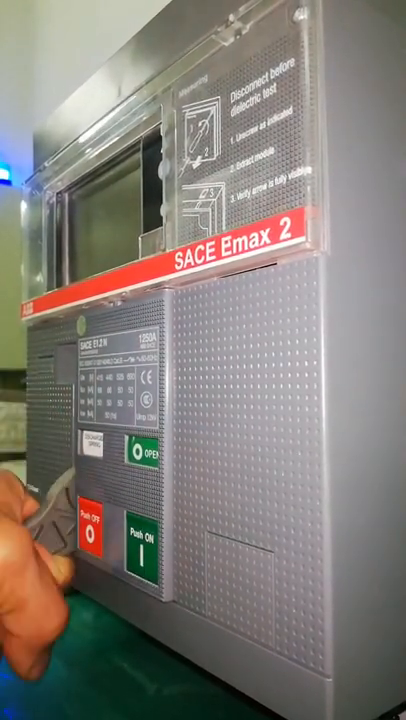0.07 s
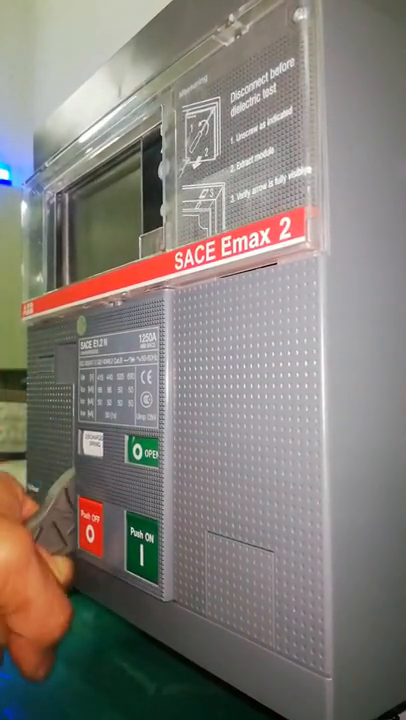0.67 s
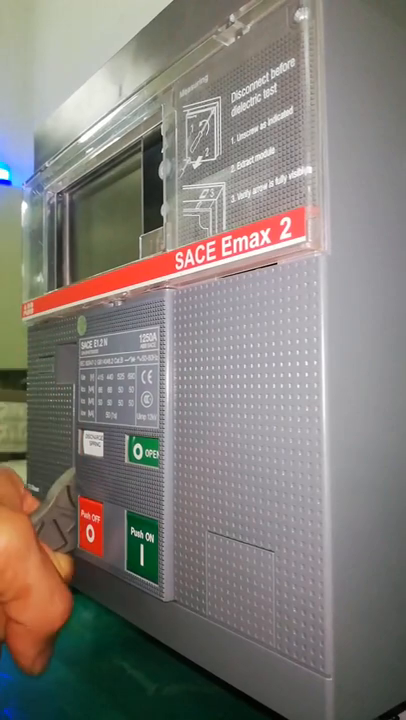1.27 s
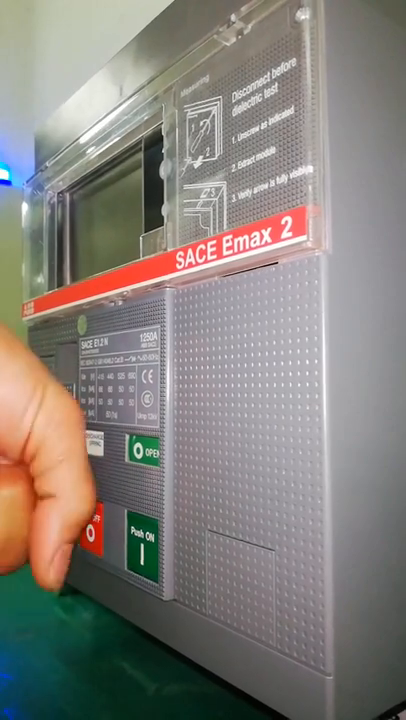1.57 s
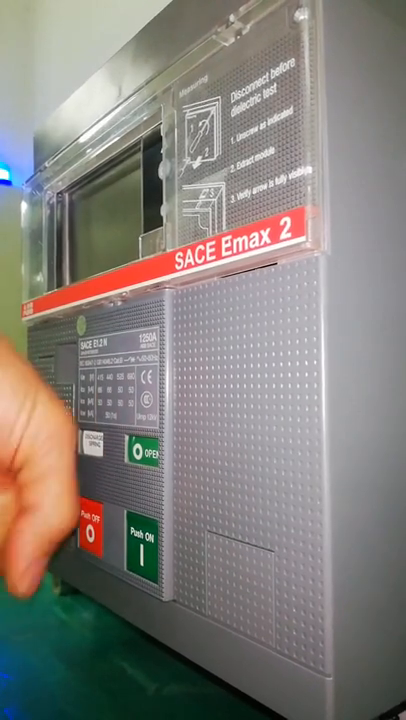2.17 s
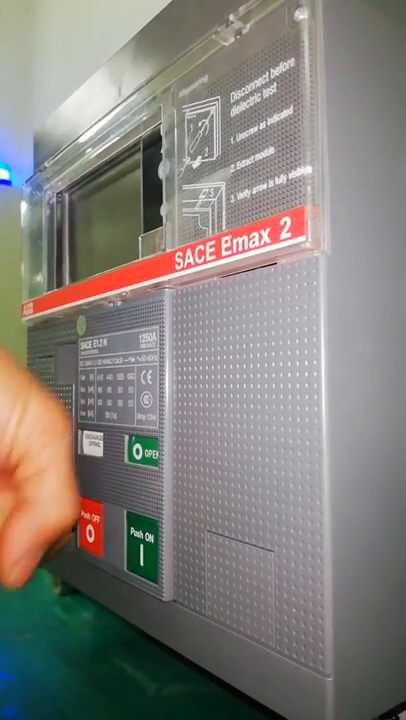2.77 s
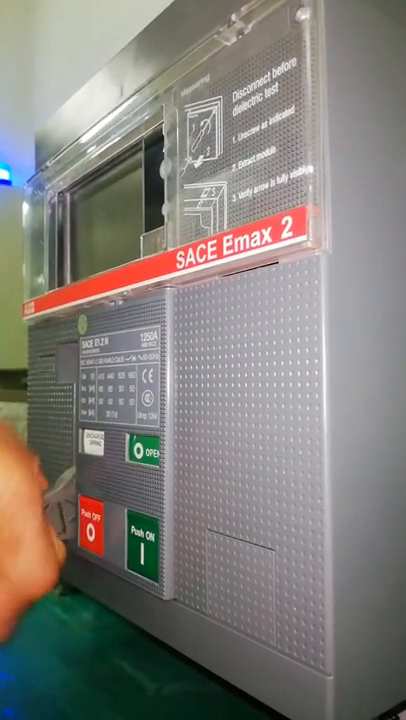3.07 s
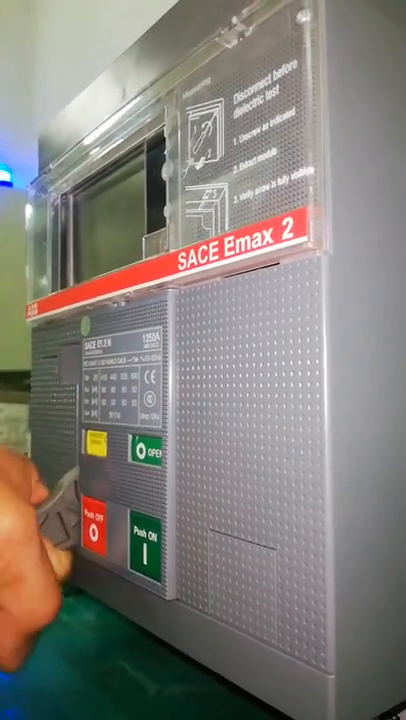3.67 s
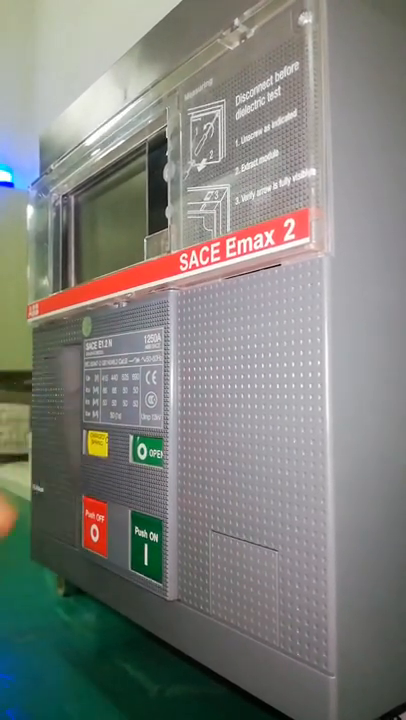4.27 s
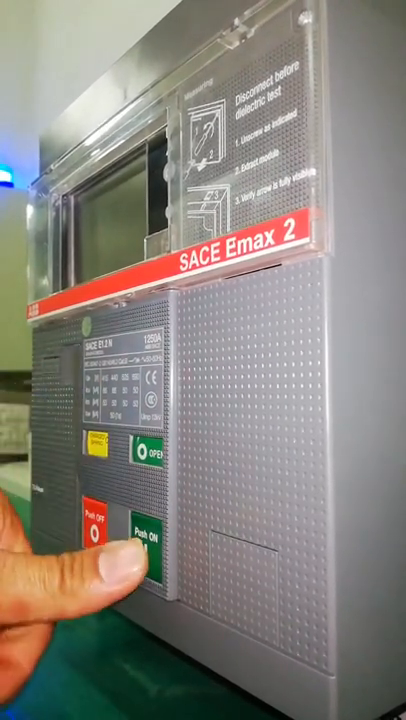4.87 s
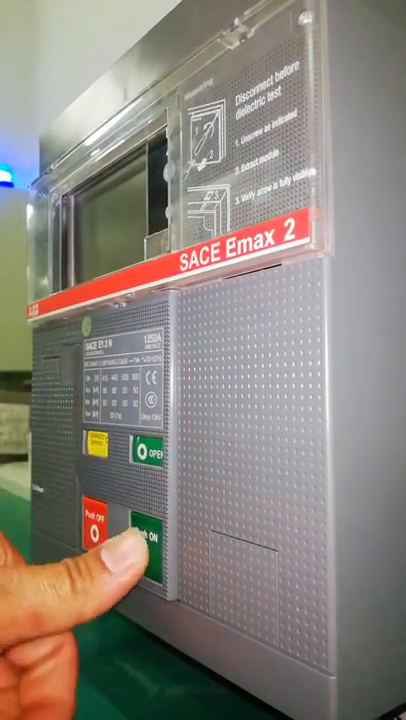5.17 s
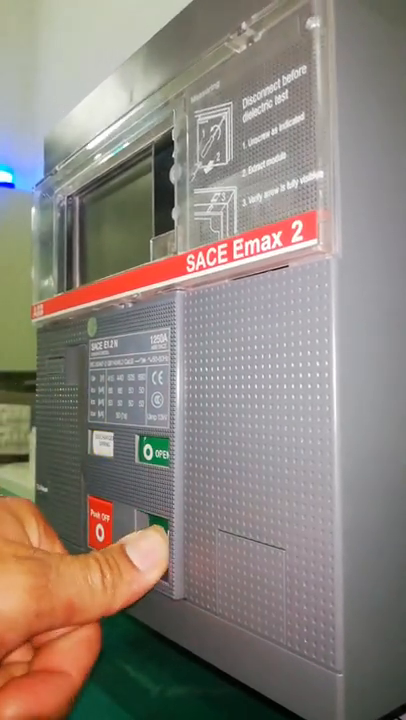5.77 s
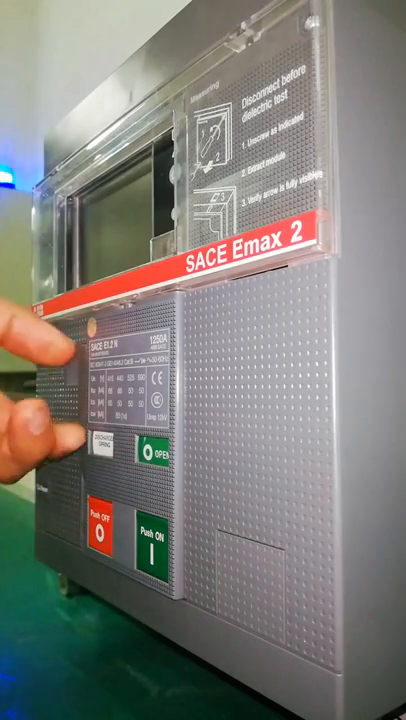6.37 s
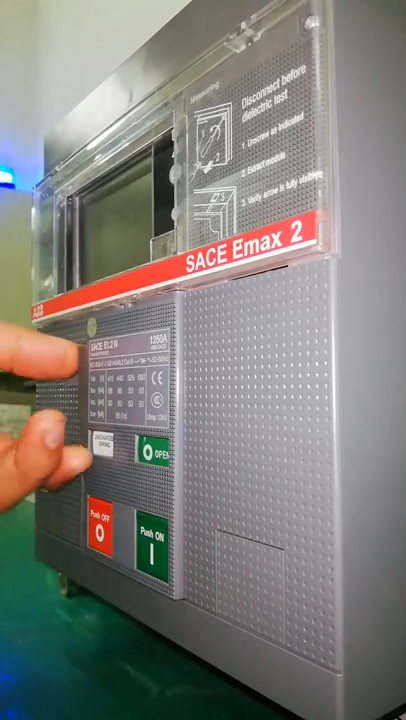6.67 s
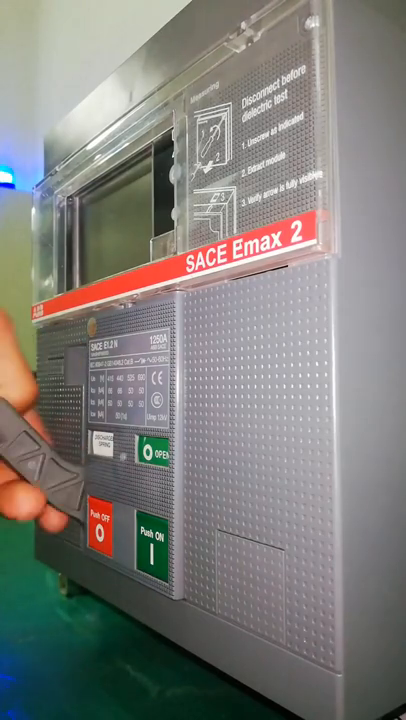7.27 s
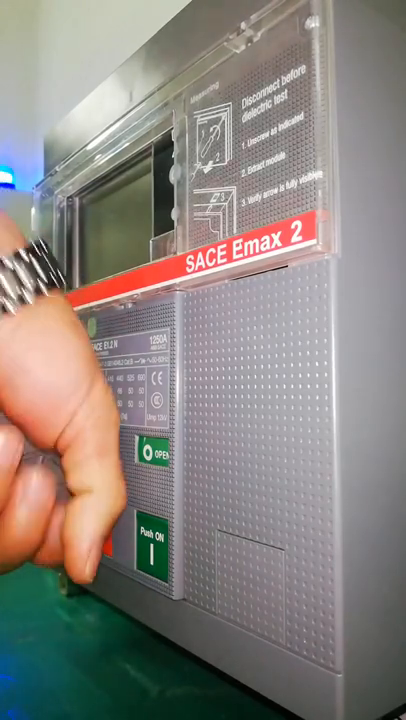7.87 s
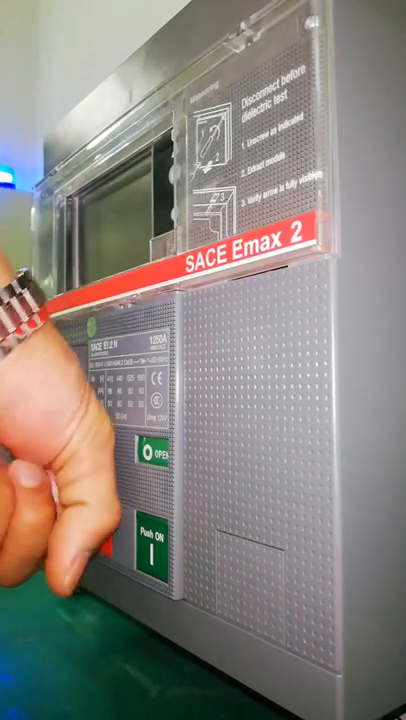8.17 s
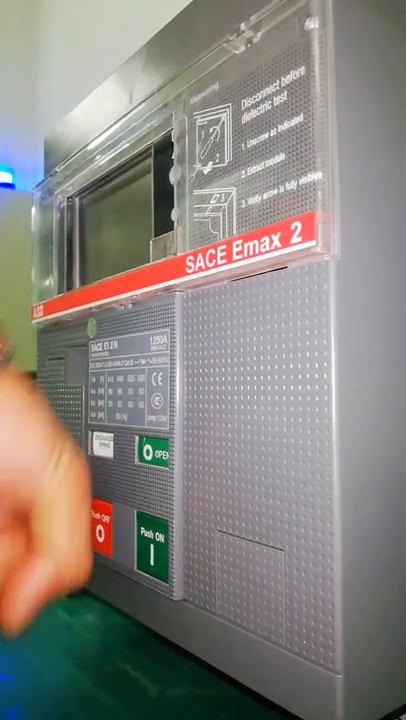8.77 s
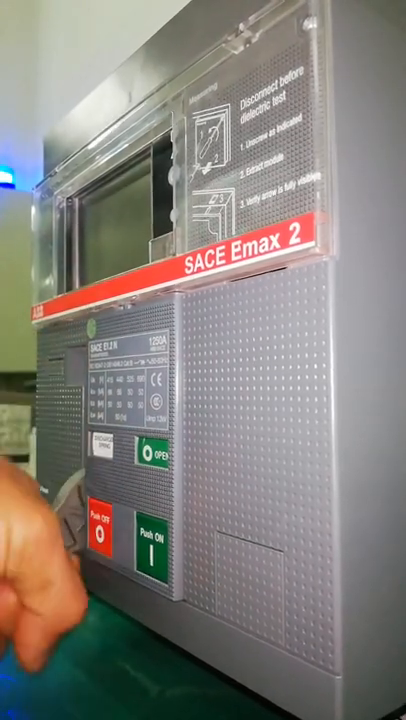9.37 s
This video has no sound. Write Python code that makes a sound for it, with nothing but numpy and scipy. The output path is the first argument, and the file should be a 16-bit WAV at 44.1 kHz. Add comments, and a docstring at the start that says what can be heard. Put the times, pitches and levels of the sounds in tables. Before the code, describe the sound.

Bursts of sharp ratchet clicks, a snap and plastic clatter lead to a circuit breaker slamming shut with a metallic ring, then more ratcheting.

```python
"""In a hard, humming hall a large circuit breaker is charged by hand: as the lever is pumped, a pawl
clicks over its ratchet, each impact exciting the resonances of the cover. The spring latches with a
snap, the lever folds away, the contacts slam shut and leave the steel ringing, and pumping resumes.
A close phone, its left port shaded, ducks each loud blow and lets the reverberation swell back."""
import sys
import numpy as np
from scipy import signal
from scipy.fft import rfft, irfft, next_fast_len
from scipy.io import wavfile
from scipy.ndimage import uniform_filter1d, map_coordinates

SR = 44100
rng = np.random.default_rng(int(sys.argv[2]) if len(sys.argv) > 2 else 0)


def transcribe(u):
    """Save the signal u as a 16-bit wav file named by the first command-line argument.

    u: samples, shape (n,) or (channels, n), limited to [-1, 1]; the rate is SR.
    q: integer samples, one column per channel.
    """
    v = np.clip(np.atleast_2d(u).T, -1, 1)
    q = np.round(v * 32767).astype(np.int16)
    wavfile.write(sys.argv[1], SR, q)


N = 424241

# down strokes: (time [s], teeth [count], gap [s], last gap [s], click level [dB], rubbing level [dB])
PULL_STROKES = [(0.0458, 3, .0373, .0375, -6.5, -55), (0.6194, 4, .031, .0518, -7, -45.5),
                (1.2106, 3, .031, .0304, -6, -58), (1.7872, 3, .0378, .0421, -6.5, -54),
                (2.372, 3, .0338, .0321, -5.5, -55), (2.9502, 3, .0391, .0305, -6.5, -45.5),
                (8.291, 1, 0, 0, -9, -66), (8.4704, 1, 0, 0, -6.5, -52),
                (8.542, 3, .0618, .0625, -8.5, -54), (9.2596, 4, .0348, .047, -9.5, -47)]
# up strokes: (time [s], teeth [count], gap [s], last gap [s], click level [dB], time to the top [s])
RETURN_STROKES = [(0.3244, 3, .0205, 0.023, -9.5, 0.16), (0.9046, 4, .022, .027, -9.5, 0.17),
                  (1.4742, 3, 0.021, 0.023, -9.5, 0.17), (2.0588, 3, .023, .028, -9.5, 0.16),
                  (2.631, 3, .022, 0.023, -9, 0.16), (3.231, 3, .028, .031, -9, .186),
                  (8.8781, 4, 0.029, 0.035, -11, 0.2), (9.5522, 3, 0.027, .0234, -10, .17)]
# the lever meeting its end stop: (time [s], level [dB])
STOP_IMPACTS = [(0.278, -24), (0.818, -36), (1.424, -24.5), (1.994, -29), (2.581, -25.5), (3.149, -28.5),
                (8.777, -35.5), (9.466, -31.5)]
# spectra of a click, its sharp edge, a cover knock and a case thump: (frequency [Hz], level [dB])
CLICK_SPECTRUM = [(500, -38), (900, -35), (1100, -9), (2000, -7), (3000, -4), (5000, 1), (7500, 1),
                  (9700, 1.5), (10800, -14.5), (15000, -35), (17000, -33)]
EDGE_SPECTRUM = [(4500, -39), (6500, -8), (7700, 4.5), (9500, -0.5), (11000, -6.5), (14800, -3.5),
                 (16000, -22)]
KNOCK_SPECTRUM = [(200, -37), (450, -14.5), (650, -1.5), (900, -3.5), (1100, 3.5), (1600, -3), (2500, -5.5),
                  (5000, -29.5)]
THUMP_SPECTRUM = [(10, -8), (30, -1), (60, 0), (130, -6), (200, -13), (500, -28), (1500, -55)]
# resonances of the ratchet and its cover: (frequency [Hz], bandwidth [Hz], gain [dB])
COVER_RESONANCES = [(1040, 54, 3.5), (1468, 30, 8), (2307, 135, 7), (2826, 69, 6.5), (3115, 180, 7),
                    (3330, 69, 8.5), (4080, 200, 9.5), (4996, 126, 5), (5970, 120, -0.5), (5880, 270, 4.5),
                    (6630, 320, 3), (7120, 89, -0.5), (7880, 320, 4), (9060, 630, 5.5), (9000, 150, 0)]


def amp(db):
    """Amplitude ratio of a level in decibels."""
    return 10 ** (np.asarray(db) / 20)


def unit(x):
    """Normalisation to rms 1."""
    return x / np.sqrt(np.mean(x ** 2) + 1e-20)


def along(points, hz):
    """Interpolation of (frequency [Hz], value) points on a logarithmic axis."""
    f, v = np.transpose(points)
    return np.interp(np.log(hz + 1), np.log(f + 1), v)


def seconds():
    """The time of each sample."""
    return np.arange(N) / SR


def wobble(rate):
    """Random modulation: a spline through `rate` Gaussian knots a second."""
    knots = rng.standard_normal(int(N * rate / SR) + 4)
    fine = np.linspace(0, len(knots) - 1, num=6 * len(knots))
    return np.interp(seconds() * rate, fine, map_coordinates(knots, [fine]))


def filtered(x, response):
    """Linear filtering: the spectrum is multiplied by a frequency response."""
    size = next_fast_len(N + SR // 4)
    hz = np.fft.rfftfreq(size, 1 / SR)
    return irfft(rfft(x, size) * response(hz), size)[..., :N]


def coloured_noise(spectrum):
    """Spectral shaping of two uncorrelated white noises, to rms 1."""
    return unit(filtered(rng.standard_normal((2, N)), lambda hz: amp(along(spectrum, hz))))


def body(spectrum, resonances=(), size=2048):
    """Minimum-phase impulse response of energy 1: Lorentzian resonances on a broad spectrum."""
    hz = np.fft.rfftfreq(size, 1 / SR)
    peaks_db = sum(gain / (1 + (2 * (hz - f) / width) ** 2) for f, width, gain in resonances)
    cepstrum = irfft(np.log(amp(along(spectrum, hz) + peaks_db)))
    cepstrum[1:size // 2] *= 2  # folding the cepstrum makes the response causal
    cepstrum[size // 2 + 1:] = 0
    response = irfft(np.exp(rfft(cepstrum)))
    return response / np.linalg.norm(response)


def strikes(times, levels, response, contact, t60, rattle_db, rattle_t60, lead=256):
    """Impact excitation of a body: chatter for `contact` seconds, a fast decay, then a weaker rattle."""
    t = np.maximum(np.arange(-lead, 2 ** 13 - lead), 0) / SR
    after = np.maximum(t - contact, 0)
    envelope = np.hypot(amp(-60 * after / t60), amp(rattle_db - 60 * after / rattle_t60))
    envelope *= 1 - np.exp(-t / 0.0004)
    sound = np.zeros((2, N + SR))
    for s, db in zip(times, levels):
        chatter = rfft(envelope * rng.standard_normal((2, len(t))))
        # a hard contact excites all frequencies alike, so the body alone sets the timbre
        chatter /= np.sqrt(np.abs(uniform_filter1d(np.abs(chatter) ** 2, size=170)) + 1e-12)
        blow = signal.fftconvolve(irfft(chatter), response[None], axes=1)
        blow *= np.linalg.norm(envelope) / np.linalg.norm(blow, axis=1, keepdims=True)
        sound[:, round(s * SR) - lead:][:, :blow.shape[1]] += amp(db) * blow
    return sound[:, :N]


def ring(start, modes, width_hz):
    """Beating: each mode is a cluster of close frequencies that interfere as they decay."""
    t = np.arange(2 * SR) / SR
    hz = np.fft.rfftfreq(len(t), 1 / SR)
    sound = np.zeros(N)
    for f, db, t60 in modes:
        band = 1 / (1 + (2 * (hz - f) / width_hz) ** 4)
        cluster = unit(irfft(band * rfft(rng.standard_normal(len(t)))))
        sound[round(start * SR):][:len(t)] += amp(db - 60 * t / t60) * cluster
    return sound


def background():
    """Superposition of wavering hum tones, a narrow-band drone and broadband ventilation noise."""
    # mains and fan tones: (frequency [Hz], level [dB])
    hum_tones = [(100, -52.5), (144, -54), (200, -56), (270, -60), (300, -63)]
    # envelope of the low drone: (time [s], level [dB])
    drone_levels = [(0, -56), (4.3, -79), (5, -51), (6.4, -60), (7.3, -58), (8.0, -47), (8.4, -52.5),
                    (8.7, -66), (9.62, -68)]
    # ventilation: (frequency [Hz], level [dB])
    air_spectrum = [(15, -60.5), (25, -18), (92, -12), (123, -7), (242, -6.5), (591, -18), (775, -16.5),
                    (1560, -22), (2110, -27), (2350, -25), (3520, -27), (4140, -34.5), (8140, -34),
                    (14400, -57.5), (16000, -74)]
    drone_spectrum = [(35, -18), (65, -5), (85, 18), (105, -16), (130, -20), (400, -60)]
    t, hum = seconds(), 0
    for f, db in hum_tones:
        peak = np.sqrt(2) * amp(db + 1.8 * wobble(4))
        hum += peak * np.sin(2 * np.pi * f * t + .45 * wobble(4))
    drone_db = np.interp(t, *np.transpose(drone_levels), right=-120)
    drone = amp(drone_db) * coloured_noise(drone_spectrum)
    return hum + drone + amp(-44.5) * coloured_noise(air_spectrum)


def teeth(strokes, fade_db=0.47):
    """Impulse trains, even but for the last gap: arrays of time [s], level [dB] and last-tooth flag."""
    clicks = []
    for start, count, gap, last_gap, db, _ in strokes:
        for k in range(count):
            last = k > 0 and k == count - 1
            clicks.append((start + k * gap + last * (last_gap - gap), db - fade_db * k, last))
    return np.transpose(clicks)


def hard_clicks(times, click_db, knock_db, edge_db, resonances):
    """Hard impact: brief contact gives a bright click and edge, longer contact a knock in the cover."""
    click = strikes(times, click_db, body(CLICK_SPECTRUM, COVER_RESONANCES + resonances),
                    contact=0.0011, t60=0.012, rattle_db=-20.5, rattle_t60=0.062)
    knock = strikes(times, knock_db, body(KNOCK_SPECTRUM, COVER_RESONANCES),
                    contact=0.0065, t60=0.06, rattle_db=-11, rattle_t60=0.19)
    edge = strikes(times, edge_db, body(EDGE_SPECTRUM),
                   contact=0.0015, t60=0.012, rattle_db=-33, rattle_t60=.03)
    return click + knock + edge


def ratchet():
    """Repeated impact: the pawl drops off each tooth, ringing higher under load than when it trails."""
    # resonances of the pawl: (frequency [Hz], bandwidth [Hz], gain [dB])
    loaded_pawl = [(3100, 240, 1.5), (4440, 530, -3), (5400, 330, 5), (5700, 200, 1), (6130, 180, 2.5),
                   (7200, 280, 5)]
    trailing_pawl = [(1500, 990, 0), (3150, 250, 2), (4520, 490, 4.5), (6540, 2400, -3.5)]
    times, db, _ = teeth(PULL_STROKES)
    down = hard_clicks(times, db, knock_db=db - 27.5, edge_db=db - 4.5, resonances=loaded_pawl)
    times, db, last = teeth(RETURN_STROKES)
    knock_db = db - 23.5 + 4.5 * last  # going up, the last tooth knocks harder
    up = hard_clicks(times, db, knock_db, edge_db=db - 19.5, resonances=trailing_pawl)
    return down + up


def rubbing(attack_s=0.018, release_s=0.027):
    """Sliding friction: the lever in its bearing and fingers on the plastic make a flickering hiss."""
    # friction noise: (frequency [Hz], level [dB])
    friction_spectrum = [(1180, -39.5), (2000, -12), (4300, -9), (4860, -10.5), (5730, -19), (9010, -3.5),
                         (11600, -23), (14900, -21.5), (16000, -29)]
    # slides of the fingers, then of the lever: (time [s], duration [s], level [dB])
    finger_slides = [(4.48, 0.1, -55.5), (7.06, 0.032, -46.5), (7.32, 0.17, -56), (7.58, .03, -55),
                     (7.743, 0.23, -51.5)]
    pulls = [(s, 0.2, db) for s, *_, db in PULL_STROKES]
    returns = [(s - .05, 0.18, -54) for s, *_ in RETURN_STROKES]
    t, power = np.arange(SR // 2) / SR, np.zeros(N + SR)
    for s, duration, db in pulls + returns + finger_slides:
        attack = 1 - np.exp(-t / attack_s)
        release = np.exp(-np.maximum(t - duration, 0) / release_s)
        power[round(s * SR):][:len(t)] += (amp(db) * attack * release) ** 2
    return np.sqrt(power[:N]) * amp(1.1 * wobble(44)) * coloured_noise(friction_spectrum)


def end_stop():
    """Cavity resonance: the hollow lever clacks on its stop, and the whole case thumps."""
    # the clack: (frequency [Hz], level [dB])
    clack_spectrum = [(300, -1.5), (700, 3), (1400, -4.5), (2000, 4), (2800, -5), (6000, -3), (9500, -1.5),
                      (11000, -12.5), (16000, -30)]
    # the hollow of the lever: (frequency [Hz], bandwidth [Hz], gain [dB])
    cavity_resonances = [(1780, 160, 4.5), (2170, 200, 4)]
    times, db = np.transpose(STOP_IMPACTS)
    clack = strikes(times, db, body(clack_spectrum, cavity_resonances),
                    contact=0.002, t60=0.025, rattle_db=-10, rattle_t60=0.1)
    thump = strikes(times, db - 19, body(THUMP_SPECTRUM),
                    contact=0.0069, t60=0.055, rattle_db=-25, rattle_t60=.1)
    return clack + thump


def light_ticks(times, tick_db, knock_db, edge_rel_db):
    """Light impact in a loose joint: very short contact gives a tick, its edge and a small knock."""
    tick = strikes(times, tick_db, body(CLICK_SPECTRUM, COVER_RESONANCES),
                   contact=0.00098, t60=0.0071, rattle_db=-15, rattle_t60=0.03)
    knock = strikes(times, knock_db, body(KNOCK_SPECTRUM, COVER_RESONANCES),
                    contact=0.0032, t60=0.067, rattle_db=-18, rattle_t60=0.13)
    edge = strikes(times, tick_db + edge_rel_db, body(EDGE_SPECTRUM),
                   contact=0.00075, t60=0.014, rattle_db=-17, rattle_t60=0.066)
    return tick + knock + edge


def swing_tops():
    """Turning points: the times [s] at which the lever reaches the top."""
    return np.array([start + to_top for start, *_, to_top in RETURN_STROKES])


def linkage(rebound_s=.022):
    """Backlash: loose joints tick at both ends of each swing and when the slack lever is handled."""
    # handling of the lever and push button: (time [s], tick level [dB], knock level [dB])
    handling = [(3.442, -29, -41), (3.541, -28, -47), (3.778, -18, -39.5), (3.849, -15.5, -29),
                (3.876, -15.5, -33), (3.924, -30, -29.5), (4.079, -19, -54), (5.4, -40, -45.5),
                (6.424, -32.5, -41), (6.761, -36.5, -39), (7.071, -32.5, -37.5), (7.305, -34.5, -42),
                (7.323, -30.5, -42.5), (7.338, -29, -44.5)]
    tops = [(s, -32.5, -38) for s in swing_tops()]
    stops, db = np.transpose(STOP_IMPACTS)
    rebound = light_ticks(stops + rebound_s, tick_db=db - 8.5, knock_db=db - 16.5, edge_rel_db=1.5)
    take_up = light_ticks(*np.transpose(tops), edge_rel_db=-22)
    return rebound + take_up + light_ticks(*np.transpose(handling), edge_rel_db=-15)


def free_play(ticks_per_turn=2, window_s=.22):
    """Clearance rattle: the slack joints tick at random while the hand turns round at the top."""
    tops = swing_tops()[:, None]
    times = (tops + window_s * rng.uniform(-.5, .5, (len(tops), ticks_per_turn))).ravel()
    db = -37.5 + 1.5 * rng.standard_normal(len(times))
    return light_ticks(times, db, knock_db=db - 10, edge_rel_db=-2)


def scuff():
    """Friction excites the cover as the lever scrapes its guide at the top of the swing."""
    # the scrape: (frequency [Hz], level [dB])
    scrape_spectrum = [(200, -14), (600, 7), (1500, 0), (4500, -2), (6000, -21), (15000, -34)]
    times = swing_tops()
    return strikes(times, np.full(len(times), -48), body(scrape_spectrum, COVER_RESONANCES),
                   contact=0.018, t60=0.056, rattle_db=-20, rattle_t60=.12)


def clatter():
    """Collision: the lever and the cover resonate together, mostly as it folds into its recess."""
    # the lever striking the cover: (time [s], click level [dB], knock level [dB])
    collisions = [(3.0217, -8, -22.5), (3.031, -7.5, -32), (4.2961, -5.5, -15), (4.3183, -1, -22),
                  (4.3827, -3.5, -21.5), (4.392, -22, -27), (4.4304, -9, -22.5), (4.461, -15, -25),
                  (4.479, -24.5, -43), (7.208, -16.5, -36)]
    # the plastic lever: (frequency [Hz], bandwidth [Hz], gain [dB])
    lever_resonances = [(1400, 300, -6), (2050, 400, 7), (2870, 440, -7), (3470, 300, 3.5),
                        (4350, 900, -3.5)]
    times, click_db, knock_db = np.transpose(collisions)
    return hard_clicks(times, click_db, knock_db, edge_db=click_db - 13, resonances=lever_resonances)


def latch():
    """Snap-through: the charged spring goes over centre, hits its catch and shakes the case."""
    # blows on the catch: (time [s], level [dB])
    blows = [(3.5896, -9), (3.5938, -1), (3.596, -3.5)]
    # the snap: (frequency [Hz], level [dB])
    snap_spectrum = [(100, -34), (300, -28), (700, -1.5), (1300, -2.5), (2500, -4.5), (3600, 2),
                     (5000, 1.5), (6500, -6), (8400, 2.5), (11000, -8.5), (15500, -22), (17000, -36)]
    times, db = np.transpose(blows)
    snap = strikes(times, db, body(snap_spectrum),
                   contact=0.0024, t60=0.027, rattle_db=-26, rattle_t60=0.051)
    thump = strikes(times, db - 14.5, body(THUMP_SPECTRUM),
                    contact=0.0042, t60=0.02, rattle_db=-20, rattle_t60=.2)
    return snap + thump


def spring_ring():
    """Free vibration: the latched spring rings on in broad clusters of modes."""
    # modes of the spring: (frequency [Hz], level [dB], 60 dB decay time [s])
    modes = [(750, -45, 1.2), (1380, -36, 1), (2050, -40.5, 1.4), (3570, -34.5, 1.64), (4150, -38, 1.1),
             (5000, -40, .9), (7900, -40, .7)]
    return ring(3.594, modes, width_hz=470)


def thuds(half_width_s=0.0013):
    """Undershoot: each heavy blow gives a low thud, and the phone's high-pass filter swings back."""
    # thuds of the heaviest blows: (time [s], level [dB], filter recovery time [s])
    pulses = [(3.597, -2.5, .07), (5.6502, 1, .013), (5.6705, 2, .003)]
    t, sound = np.arange(-SR // 100, SR // 2) / SR, np.zeros(N + SR)
    pulse = np.exp(-.5 * (t / half_width_s) ** 2)
    for s, db, recovery_s in pulses:
        pole = np.exp(-1 / (recovery_s * SR))
        high_passed = signal.lfilter([1, -1], [1, -pole], pulse)
        sound[round((s + t[0]) * SR):][:len(t)] += amp(db) * high_passed
    return sound[:N]


def slam(bounce_count=3, bounce_s=.0115, bounce_loss_db=5.5):
    """Inelastic impact: the released spring drives the contacts home, and each bounce loses energy."""
    # steel blows of the drive and contacts: (time [s], level [dB])
    blows = [(5.6284, -19), (5.634, 2.5), (5.639, -4.5), (5.646, 2.5), (5.653, 5.5), (5.66, 6.5),
             (5.668, 2.5)]
    # the crash: (frequency [Hz], level [dB])
    crash_spectrum = [(100, -24), (220, -7), (470, -1.5), (650, -6.5), (1200, 1), (2500, -2.5),
                      (3500, -0.5), (6000, -5.5), (8400, 0.5), (11000, -10.5), (15500, -26), (17000, -46)]
    last_s, last_db = blows[-1]
    bounces = [(last_s + k * bounce_s, last_db - k * bounce_loss_db) for k in range(1, bounce_count + 1)]
    times, db = np.transpose(blows + bounces)
    crash = strikes(times, db, body(crash_spectrum),
                    contact=0.0027, t60=0.027, rattle_db=-10, rattle_t60=0.16)
    thump = strikes(times, db - 15.5, body(THUMP_SPECTRUM),
                    contact=0.0053, t60=.022, rattle_db=-23, rattle_t60=0.062)
    return crash + thump


def frame_ring():
    """Light damping: the low modes of the steel frame ring long after the slam."""
    # modes of the frame: (frequency [Hz], level [dB], 60 dB decay time [s])
    modes = [(236, -34, 1.8), (269, -31.5, 4.1), (307, -25, 1.86), (364, -33, 2.3), (449, -34, 1.1),
             (508, -29, 1.46), (1176, -29.5, 2.13)]
    return ring(5.647, modes, width_hz=18.5)


def hall(x, build_up_s=.012):
    """Reverberation: the hall stores energy in a diffuse field that drains away, the treble first."""
    # decay in the hall: (frequency [Hz], reverberation time [s])
    decay_times = [(100, 0.73), (300, 2.97), (1200, 2.92), (3300, 2.135), (5000, 1.51), (8000, 1.11),
                   (11000, 0.68), (15000, 0.47)]
    # colour of the diffuse field: (frequency [Hz], gain [dB])
    colour = [(40, -26), (150, -13), (300, -1), (500, -0.5), (700, -4), (1300, -1.5), (2500, 2),
              (4000, -0.5), (6000, 0.5), (8200, 1), (11000, 3), (15000, 5)]
    hz, t, fed = signal.stft(x, SR, nperseg=512)
    power = np.abs(uniform_filter1d(np.abs(fed) ** 2, size=3, axis=0))
    lags = t[:len(t) // 3]
    decay = amp(-60 * lags / along(decay_times, hz)[:, None]) ** 2
    decay *= 1 - np.exp(-(lags / build_up_s) ** 2)
    stored = np.abs(signal.fftconvolve(power, decay * t[1], axes=1)[:, :len(t)])
    noise = signal.stft(rng.standard_normal((2, N)), nperseg=512)[2]
    diffuse = noise / np.std(noise) * np.sqrt(stored) * amp(along(colour, hz))[:, None]
    return signal.istft(diffuse, nperseg=512)[1][:, :N]


def ports(pair, shade, delay_s=.00059):
    """Acoustic shadow: the right port faces the breaker; above the bass the left is late and weaker."""
    # likeness of the two ports: (frequency [Hz], coherence [0-1])
    port_coherence = [(60, .95), (130, .86), (280, .72), (550, .52), (2000, .4), (8000, .55)]
    size = next_fast_len(N + SR // 4)
    hz = np.fft.rfftfreq(size, 1 / SR)
    right, unrelated = rfft(pair, size)
    coherence = np.clip(along(port_coherence, hz), 0, 1)
    left_gain = amp(along(shade, hz))
    lag = np.exp(-2j * np.pi * hz * delay_s * np.clip((hz - 300) / 300, 0, 1))
    left = left_gain * (coherence * lag * right + np.sqrt(1 - coherence ** 2) * unrelated)
    return irfft(np.array([left, right]) * 2 / (1 + left_gain), size)[:, :N]


def scene():
    """Superposition at the phone of close impacts, ringing steel and the sound of the hall."""
    # shadow on near and far sound: (frequency [Hz], left minus right level [dB])
    near_shade = [(200, 0), (400, 0), (700, -6), (1300, -10), (2400, -13), (4400, -18), (8000, -25),
                  (14000, -20)]
    far_shade = [(200, 0), (380, -1), (700, -6), (1300, -6.5), (2400, -7.5), (4400, -11), (8100, -18),
                 (15000, -9)]
    lever = ratchet() + linkage() + free_play() + scuff() + end_stop() + clatter()
    snap, bang = latch(), slam()
    reverberation = hall(amp(-13.5) * lever[0] + amp(-3.5) * snap[0] + amp(2.5) * bang[0])
    steel = spring_ring() + frame_ring()
    near = ports(lever + snap + rubbing(), near_shade)
    far = ports(bang + reverberation + steel + background(), far_shade)
    return near + far + thuds()


def gain_control(x, threshold_db=-17, squeeze=0.52, release_db_per_s=42.5):
    """Dynamic compression: the gain drops at once on a loud blow and creeps back."""
    power = np.abs(uniform_filter1d(np.max(x ** 2, axis=0), size=88))
    cut_db = squeeze * np.maximum(10 * np.log10(power + 1e-12) - threshold_db, 0)
    recovery = release_db_per_s * seconds()
    held_db = np.maximum.accumulate(cut_db + recovery) - recovery
    return x * amp(-uniform_filter1d(held_db, size=64))


def record(dry):
    """Compression, clipping at full scale and a steep band limit in the phone."""
    cutoff_hz = 16050
    clipped = np.clip(gain_control(dry), -1, 1)
    return filtered(clipped, lambda hz: 1 / np.sqrt(1 + (hz / cutoff_hz) ** 100))


dry = scene()
out = record(dry)
transcribe(out)
```